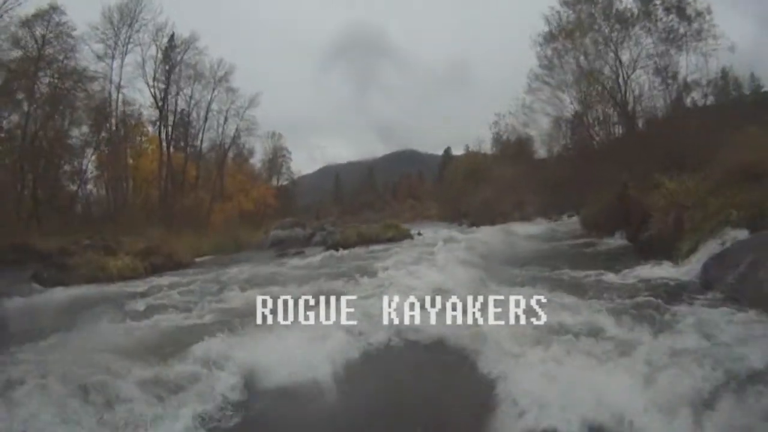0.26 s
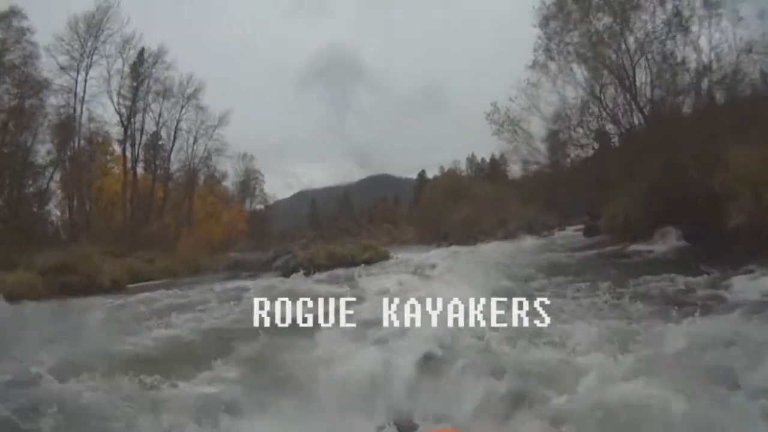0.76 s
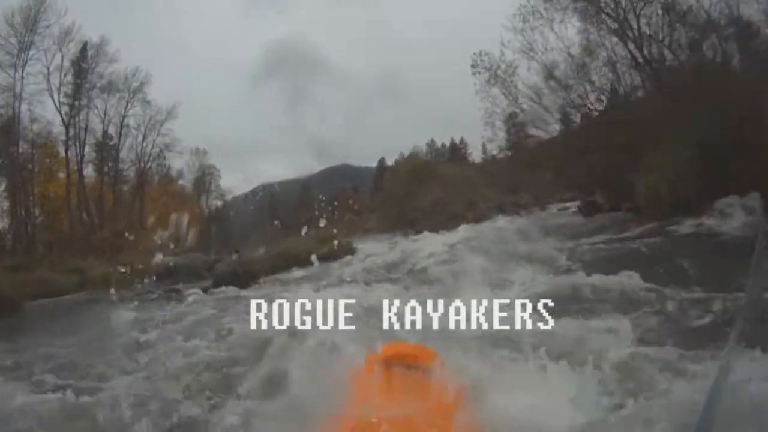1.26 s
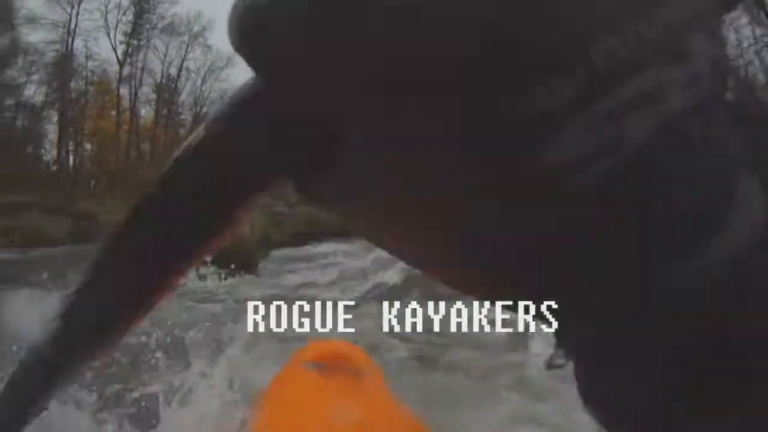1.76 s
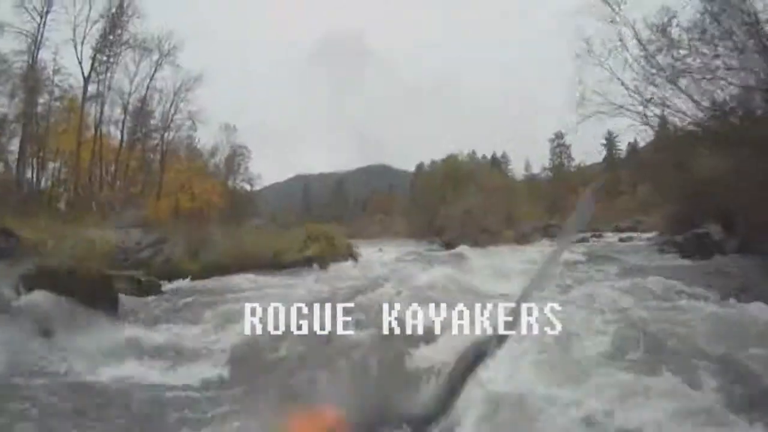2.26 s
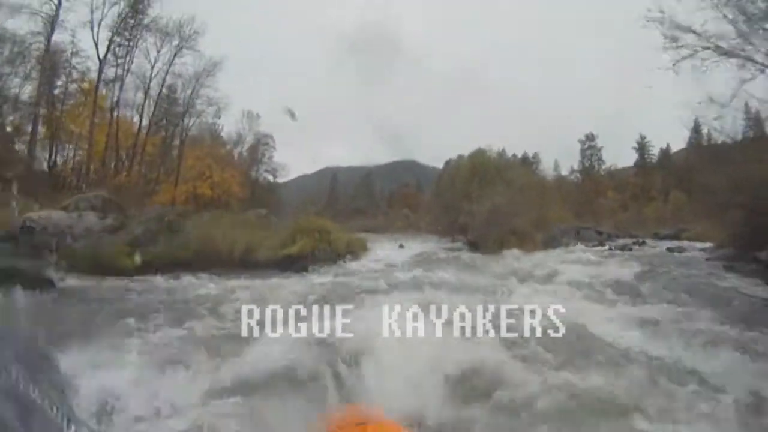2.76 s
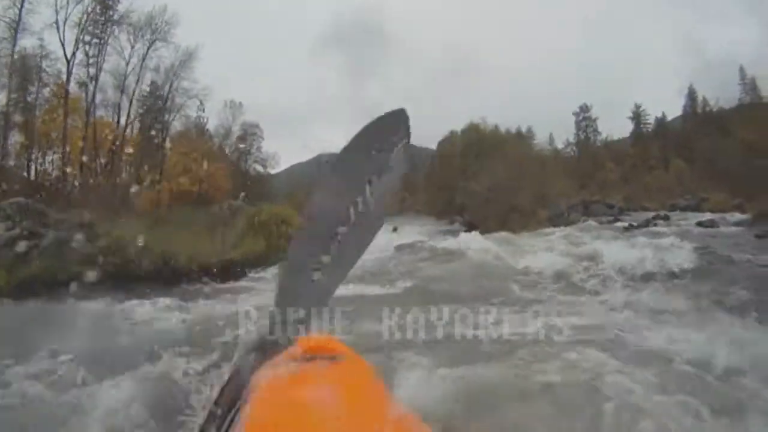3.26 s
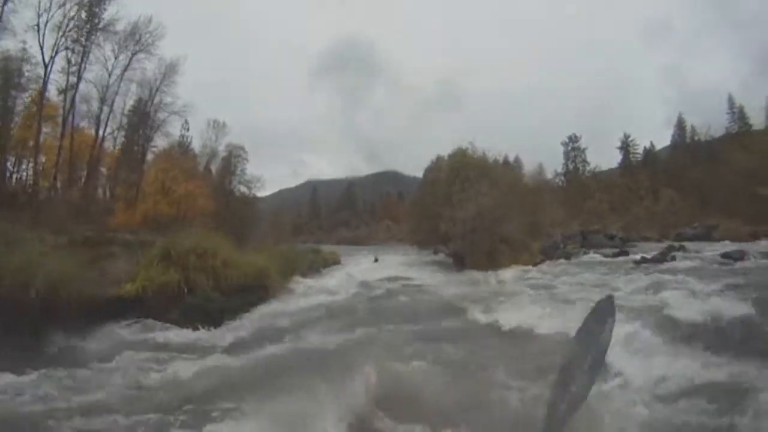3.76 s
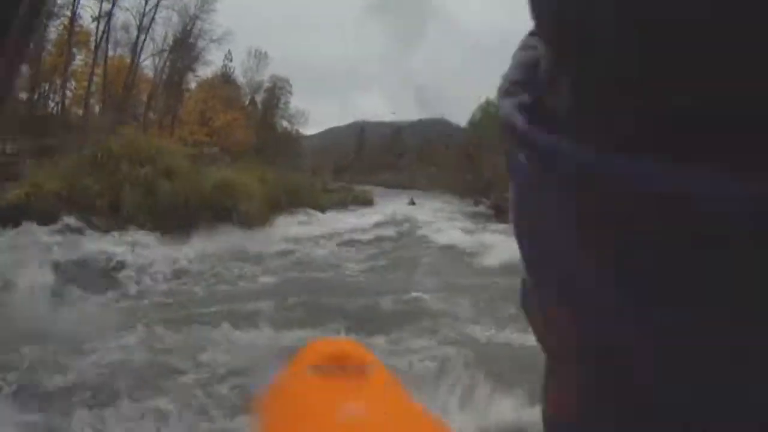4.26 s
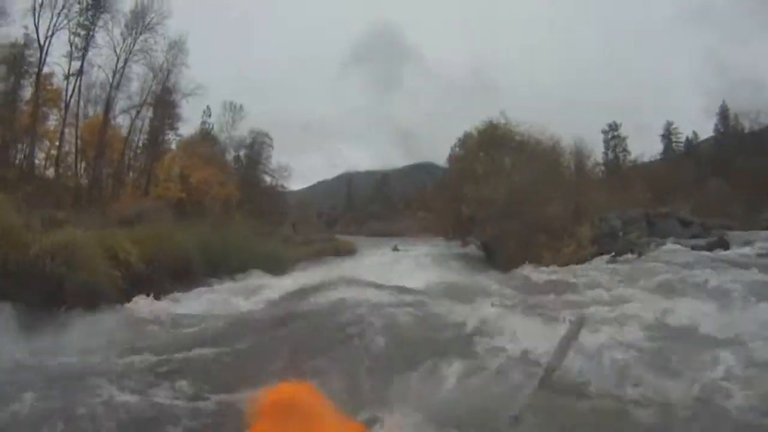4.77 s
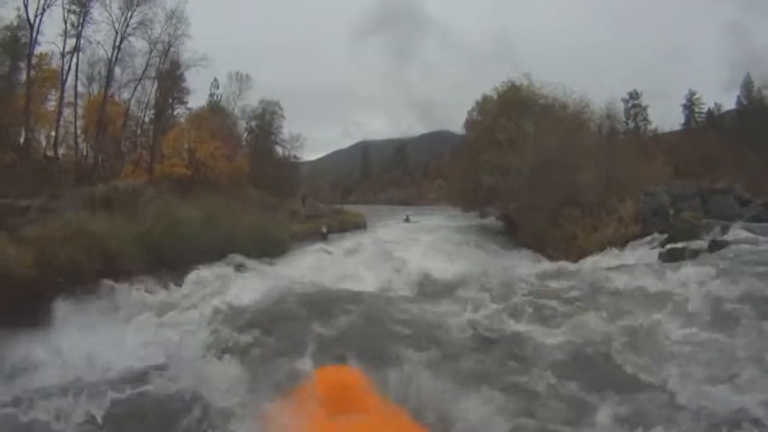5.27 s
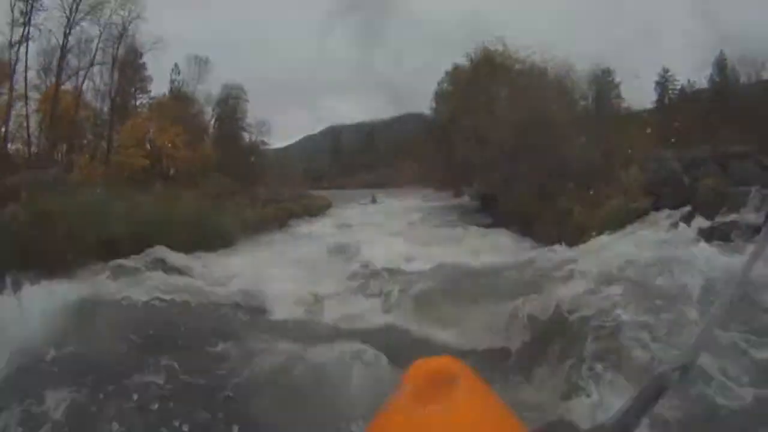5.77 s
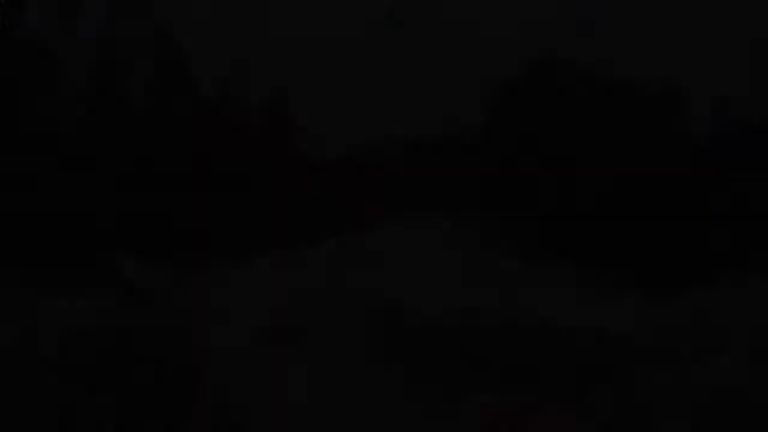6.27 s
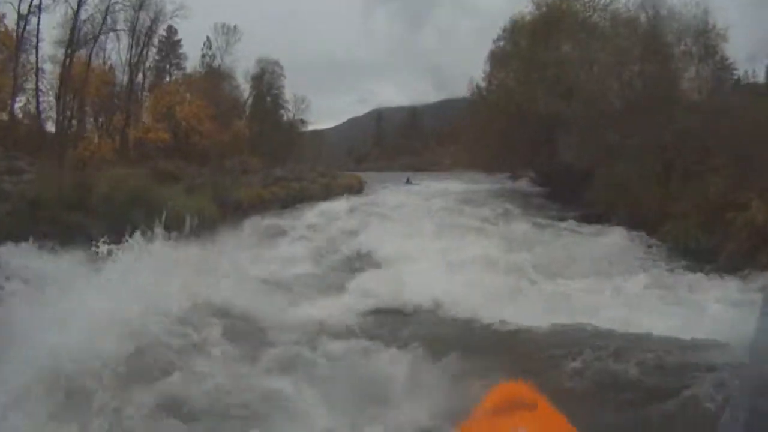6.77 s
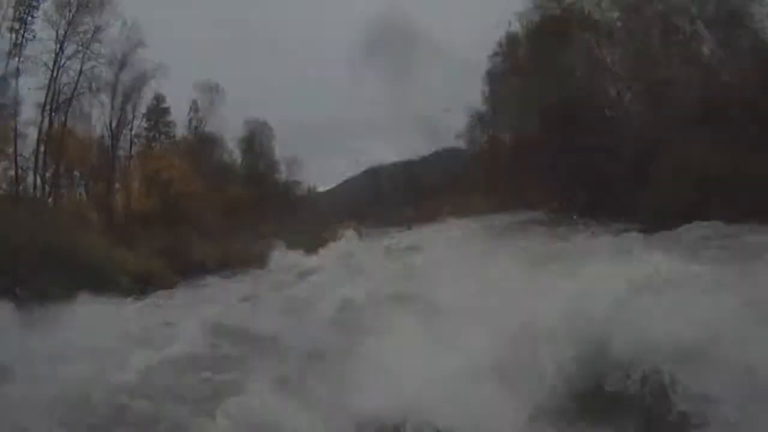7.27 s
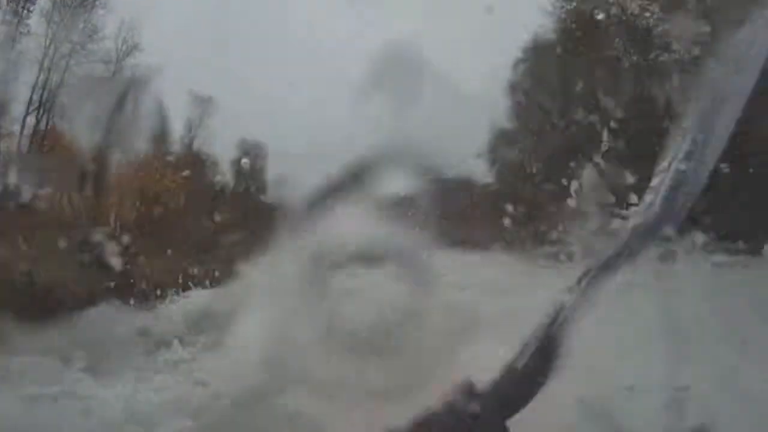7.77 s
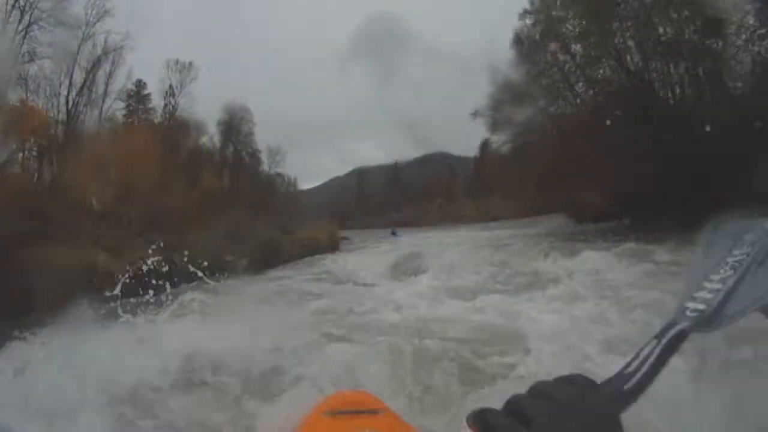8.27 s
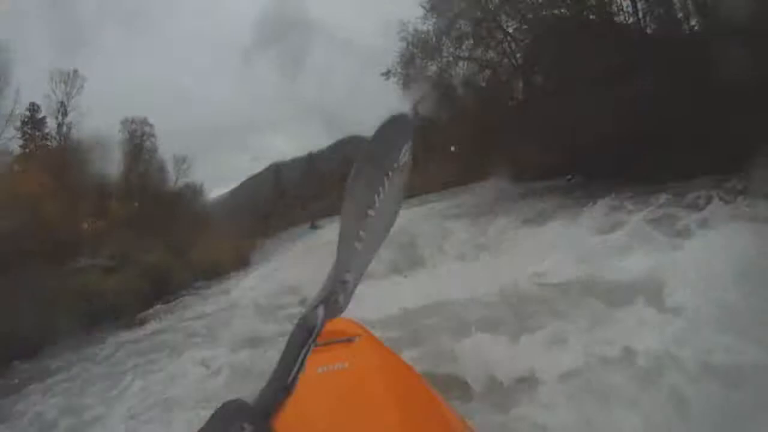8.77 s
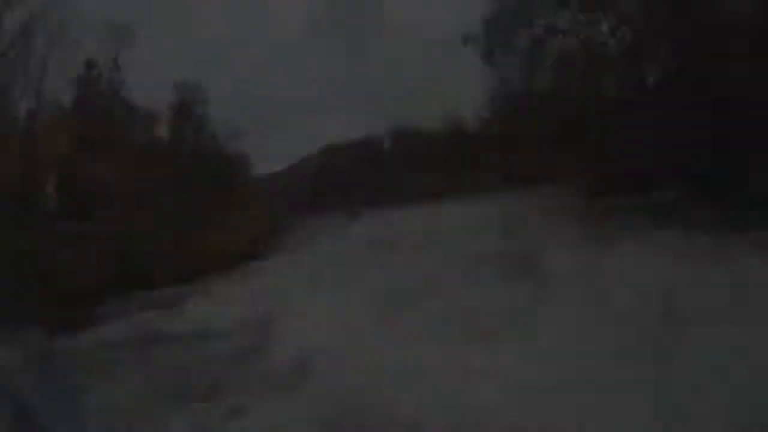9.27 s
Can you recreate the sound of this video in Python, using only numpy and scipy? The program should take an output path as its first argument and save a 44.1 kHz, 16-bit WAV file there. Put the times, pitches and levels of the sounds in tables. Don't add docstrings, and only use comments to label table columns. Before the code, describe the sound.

A continuous rapid roars from inside a kayak, heard by a helmet camera in a sealed plastic housing, so the foam sounds boxy and nasal. Low rocking thumps, hull slaps, paddle gulps and scattered drops mark the ride. It fades to silence after six seconds, swells into a dense splash, cuts off sharply, then fades back with dripping ticks and two heavy thumps near the end.

```python
import sys
import numpy as np
from scipy import signal
from scipy.fft import rfft, irfft, next_fast_len
from scipy.io import wavfile
from scipy.ndimage import uniform_filter1d, map_coordinates

SR = 44100
rng = np.random.default_rng(int(sys.argv[2]) if len(sys.argv) > 2 else 0)


def to_linear_factor(level_db):
    exponent = np.asarray(level_db, float) / 20
    return 10 ** exponent


def store_wav(level_fs):
    pcm = np.round(np.clip(np.atleast_2d(level_fs), -1, 1) * 32767)
    wavfile.write(sys.argv[1], SR, pcm.T.astype(np.int16))


N = 420273


def unit(x):
    return x / np.sqrt(np.mean(x ** 2) + 1e-20)


def along(points, hz):
    f, v = np.transpose(points)
    return np.interp(np.log(hz + 1), np.log(f + 1), v)


def curves(rows):
    s, *cols = np.transpose(rows)
    return [np.interp(np.arange(N) / SR, s, c) for c in cols]


def swells(rows):
    s, half, *cols = np.transpose(rows)
    t = np.arange(0, N / SR + 1, 0.002)
    bells = np.exp(-((t[:, None] - s) / half) ** 2)
    return curves(np.column_stack([t] + [bells @ c for c in cols]))


def wobble(rate):
    return map_coordinates(rng.standard_normal(int(N * rate / SR) + 4), [np.arange(N) * rate / SR])


def humps(modes, hz, order):
    return sum(to_linear_factor(db) ** 2 / (1 + (2 * (hz - c) / w) ** 2) ** order for c, w, db in modes)


def above(hz, edge_hz):
    return 1 / (1 + (edge_hz / (hz + 1)) ** 6)


def coloured(x, power):
    m = 2 * next_fast_len(N // 2 + SR // 2)
    cep = irfft(np.log(power(np.fft.rfftfreq(m, 1 / SR)) + 1e-12) / 2, m)
    cep[1:m // 2] *= 2
    cep[m // 2 + 1:] = 0
    return irfft(rfft(x, m) * np.exp(rfft(cep)), m)[:N]


def add(track, s, sound):
    part = track[round(s * SR):][:len(sound)]
    part += sound[:len(part)]


def housing(x):
    # centre in Hz, width in Hz, level in dB.
    resonances = [(1270, 310, -2), (2047, 308, 2), (2310, 540, 0.5), (2480, 306, 1), (3500, 330, -4),
                  (3800, 630, -8.5), (4620, 1100, -12.5), (5440, 410, -19), (5550, 250, -22.5),
                  (6470, 370, -18.5), (6950, 650, -17.5), (7370, 640, -17), (8374, 690, -12.5),
                  (9556, 390, -10.5), (9900, 290, -12), (10710, 450, -23), (12880, 300, -32),
                  (13360, 330, -21.5), (13820, 280, -21), (14280, 510, -13), (14800, 400, -19)]
    # frequency in Hz, level in dB.
    leak = [(500, -19.5), (1500, -21), (3000, -13), (5200, -19), (6050, -41), (7500, -19), (10500, -29.5),
            (12200, -37), (13600, -48), (15000, -45)]
    return coloured(x, lambda hz: humps(resonances, hz, order=2) + to_linear_factor(along(leak, hz)) ** 2)


def patchy(patchy_db):
    z = signal.stft(rng.standard_normal(N + 512), nperseg=512)[2]
    field = uniform_filter1d(rng.standard_normal(z.shape), 8, 0)
    field = uniform_filter1d(field, 10, 1)
    return unit(signal.istft(z * to_linear_factor(patchy_db * unit(field)), nperseg=512)[1][:N])


def foam(rate):
    burst = rng.random(N) < rate / SR * to_linear_factor(4 * wobble(20))
    sizes = burst * to_linear_factor(3 * np.minimum(rng.exponential(size=N), 3))
    puff = np.exp(-np.arange(200) / (0.0013 * SR))
    return unit(signal.fftconvolve(sizes, puff)[:N] * rng.standard_normal(N))


def river():
    # time in seconds, roar in dB, mount rocking in dB.
    flow = [(0, -53, -63), (.5, -46.5, -63.5), (1.0, -47.5, -55), (1.7, -52, -55.5), (2.3, -50.5, -54),
            (3.8, -51.5, -57.5), (4.65, -51.5, -54), (4.8, -53.5, -58), (5.5, -53.5, -57),
            (6.42, -49.5, -57), (6.85, -46, -51.5), (7.6, -44, -51), (7.7, -53.5, -59),
            (8.04, -51.5, -50.5), (8.2, -47, -48), (8.55, -47.5, -49.5), (9.13, -55, -45.5),
            (9.52, -59, -58.5)]
    # time in seconds, half length in seconds,
    # roar swell in dB, extra spray in dB.
    surges = [(.7, 0.073, 1.5, 0.5), (1.31, 0.16, -2.5, 1.5), (1.45, 0.079, 2.5, -0.5),
              (2.03, 0.088, 0.5, 0.5), (2.4, 0.08, 0.5, 0), (2.74, 0.069, 1, 0), (2.89, .05, -1, 0.5),
              (3.0, 0.13, 1, 2), (3.31, 0.16, 4, 0.5), (4.0, 0.18, 1.5, 0), (4.19, 0.084, 3.5, 0.5),
              (4.58, 0.077, 1, 0.5), (7.24, 0.059, 2.5, 0), (6.32, .05, -0.5, -1),
              (7.45, 0.038, -3.5, -1.5), (7.59, 0.041, -8, -1.5), (7.8, 0.013, -7, 1),
              (8.65, 0.043, 4, 2.5), (.45, 0.074, 0, 0.5), (7.5, 0.014, -3, 0), (7.555, .008, 1, 3),
              (5.19, .05, -0.5, -1), (8.73, 0.021, 0, -0.5), (8.95, 0.084, 3.5, 2), (9.27, 0.071, 5, 1.5),
              (9.39, 0.057, 4.5, 1.5)]
    # time in seconds, half length in seconds,
    # change of rocking in dB.
    lurches = [(.82, .08, -3), (1.1, 0.11, -6), (1.33, .07, 4), (1.55, .12, -0.5), (2.12, .1, 3),
               (2.64, 0.048, -2), (3.0, 0.13, 5), (3.26, 0.2, 7), (4.09, 0.067, 9.5), (4.31, 0.14, 12),
               (4.42, 0.022, -4), (4.53, .03, -3), (4.7, .04, -4), (1.7, .05, -1), (1.88, .05, 0.5),
               (7.7, .1, -3.5), (5.22, 0.046, -5), (4.2, .05, 2), (3.4, 0.066, -4), (4.92, 0.076, 6.5),
               (5.72, 0.17, 7), (6.97, 0.086, 8), (7.26, 0.11, 1.5), (8.4, 0.045, 1), (8.6, 0.022, 8),
               (8.8, 0.049, 5.5), (9.15, 0.032, 5), (9.33, .04, 4)]
    # frequency in Hz, level in dB.
    body = [(40, -32.5), (80, -4.5), (160, -5.5), (300, -4), (600, -9), (1000, -7.5), (1400, -21.5),
            (2500, -53)]
    # centre in Hz, width in Hz, level in dB.
    mount = [(42.8, 17, 0), (58, 30, -12), (28.2, 14, -4)]
    # centre in Hz, width in Hz, level in dB.
    slosh = [(102, 123, -18.5)]
    wash_over_roar_db, surge_share, rocking_share = -9, 0.73, 0.13

    flow_db, rock_db = curves(flow)
    surge_db, spray_db = swells(surges)
    lurch_db, = swells(lurches)
    rock_db = rock_db + lurch_db
    churn_db = 0.33 * wobble(4.7) + 0.5 * wobble(25)

    roar = unit(housing(patchy(patchy_db=0.76) + to_linear_factor(-8.0) * foam(370)))
    spray = coloured(roar, lambda hz: above(hz, 2100))
    wash = unit(coloured(patchy(patchy_db=1.5), lambda hz: to_linear_factor(along(body, hz)) ** 2))
    rock = unit(coloured(rng.standard_normal(N), lambda hz: humps(mount + slosh, hz, order=2)))

    brighter = roar + (to_linear_factor(spray_db + 1.55) - 1) * spray
    air = to_linear_factor(flow_db + surge_db + churn_db + 2.5) * brighter
    wash_db = flow_db + wash_over_roar_db + surge_share * surge_db + churn_db
    wash_db = wash_db + rocking_share * (rock_db - flow_db)
    return air + to_linear_factor(wash_db) * wash + to_linear_factor(rock_db - 0.5 + 0.94 * wobble(7.5)) * rock


def ring(modes, hz, t, detune):
    out = 0
    for (multiple, db, t60), d in zip(modes, detune):
        mode_hz = hz * multiple * (1 + 0.025 * d)
        out = out + to_linear_factor(db - 60 * t / t60) * np.sin(2 * np.pi * mode_hz * t)
    return out * (1 - np.exp(-t / 0.00036))


def drops():
    # time in
    # seconds, hollow tap in dB, sharp tick against the tap in dB, tap in Hz, tick in Hz.
    single_drops = [(2.047, -41, 10.5, 1200, 2050), (2.895, -39, -14, 1270, 2380),
                    (3.021, -32, -3.5, 1350, 2300), (3.0224, -48.5, 15.5, 1100, 2370),
                    (3.0312, -36.5, -5, 1150, 2130), (3.081, -40, -11, 1020, 2310),
                    (4.62, -48, 14, 1280, 2520), (4.654, -44.5, 5, 950, 2170),
                    (5.302, -42, -10, 1090, 2400), (5.475, -29, -16, 1130, 2290),
                    (6.021, -40, 6, 1240, 2130), (6.054, -40.5, -8, 1030, 2130),
                    (6.231, -34, -14, 990, 2130), (6.96, -41, 8, 1110, 2300),
                    (7.061, -27.5, -8, 1075, 2050), (.415, -57, 13, 1250, 2120),
                    (0.441, -60, 13, 1250, 2550), (1.243, -46, 10, 1250, 2370), (4.161, -45, 1, 1250, 2480),
                    (5.224, -50, -4, 1000, 2300), (5.591, -47, -11, 1100, 2300),
                    (6.79, -51, 11, 1250, 2180), (7.033, -47, 11, 1250, 2460), (3.351, -49, 9, 1250, 2300),
                    (8.059, -42, -10, 1220, 2190), (8.175, -41, 5, 1350, 1950), (8.25, -39.5, 5, 1380, 2000),
             (8.3, -40, 3, 1290, 1990), (8.12, -49, 8, 1290, 2470), (8.205, -47, 11, 1290, 2050),
             (8.376, -55, -3, 990, 2380), (8.3968, -38, 2, 1520, 2410), (8.533, -33.5, -2, 1180, 2170),
             (8.78, -39.5, -9, 1300, 2480), (8.883, -37, -17, 1130, 2310), (8.931, -55, 6, 1230, 2250),
             (9.153, -33.5, -5, 1070, 2130), (9.323, -39.5, 1.5, 1090, 2340), (9.472, -43.5, 0, 1210, 2150),
             (9.523, -48.5, 4, 1220, 2500)]
    # time in seconds,
    # tap in dB, tick against it in dB, fine spit against it in dB, tap in Hz.
    splash = [(7.377, -33, -4, -8, 1250), (7.4196, -27, 10, 5, 1700), (7.428, -51.5, 10, 23, 1230),
              (7.4508, -27, -2, -1.5, 1280), (7.4534, -31.5, -7, -1, 1500), (7.475, -36.5, 11, 7, 1670),
              (7.5204, -34.5, 2, 4.5, 1370), (7.5265, -54.5, 14, 9, 1370), (7.5315, -52, 12, 6, 1370),
              (7.5416, -43, 14.5, 7, 1370), (7.5649, -46, 4, 8, 1300), (7.5686, -31, -9, -3, 1190),
              (7.571, -36, -9, -5, 1280), (7.5843, -48, 8, 4, 1180), (7.589, -46, -6, -4, 1000),
              (7.601, -44.5, -2, 4, 1110), (7.72, -47, -2, -8.5, 1190), (7.753, -41, 4.5, -11, 1500),
              (7.785, -41, -4, -12, 1220), (7.81, -54, 12, 1, 1120), (7.834, -48.5, 6, 10, 1410),
              (7.8448, -53, 8, 16.5, 1300), (7.870, -37, 3, -1, 1390)]
    # time in seconds, level in dB.
    knocks = [(3.081, -42), (6.964, -35), (7.064, -34), (7.377, -29), (7.4199, -24.5), (7.451, -35),
              (7.541, -37), (7.568, -28), (7.785, -35), (8.06, -37), (8.252, -38), (8.301, -40),
              (8.533, -37), (9.323, -32.5)]
    # multiple of the tap, level in dB, t60 in seconds.
    shell = [(.58, -11, 0.0078), (.8, -9, 0.013), (1, 6.5, 0.0099), (1.25, -6, 0.007)]
    # multiple of the tick, level in dB, t60 in seconds.
    cavity = [(.96, 4, 0.013), (1.06, -10, .009)]
    # multiple of the splash tick, level in dB, t60 in seconds.
    seam = [(1.6, -2.5, 0.0096), (3.55, -8, 0.0069)]
    splash_tick_hz, knock_db, kick_db, ping_db = 2350, -18, -17.5, -17

    rings, spits, pings = np.zeros(N), np.zeros(N), np.zeros(N)
    t = np.arange(SR // 8) / SR
    knock = np.sin(2 * np.pi * 330 * t) * to_linear_factor(-60 * t / 0.0056)
    kick = np.sin(2 * np.pi * 47 * t) * to_linear_factor(-60 * t / 0.1)
    hits = [(*row, splash_tick_hz) for row in splash]
    for s, db, tick_db, tap_hz, tick_hz in single_drops:
        hits.append((s, db, tick_db, -6 + 0.5 * tick_db, tap_hz, tick_hz))

    for s, db, tick_db, spit_db, tap_hz, tick_hz in hits:
        detune, hiss = rng.standard_normal((2, len(t)))
        spit = hiss * (1 - np.exp(-t / 0.0004)) * to_linear_factor(-60 * t / 0.0065)
        add(rings, s, to_linear_factor(db) * ring(shell, tap_hz, t, detune))
        add(rings, s, to_linear_factor(db + tick_db) * ring(cavity, tick_hz, t, detune[3:]))
        add(rings, s, to_linear_factor(db + spit_db) * ring(seam, splash_tick_hz, t, detune[6:]))
        add(rings, s, to_linear_factor(db + knock_db) * knock + to_linear_factor(db + kick_db) * kick)
        add(pings, s, to_linear_factor(db + ping_db - 60 * t / 0.005) * hiss)
        add(spits, s, to_linear_factor(db + spit_db + 36.5) * spit / np.linalg.norm(spit))
    for s, db in knocks:
        add(rings, s, to_linear_factor(db) * knock)

    clicks = coloured(pings, lambda hz: above(hz, 11000) ** 2)
    spits = coloured(spits, lambda hz: above(hz, 3300) / (1 + (hz / 5500) ** 2) + to_linear_factor(-4) * above(hz, 9800))
    return rings + clicks + housing(spits)


def gulps():
    # start in seconds, length in seconds, first beat in Hz,
    # level in dB, hiss in dB.
    deep = [
        (1.224, 0.082, 118, -43.5, -47),
        (2.89, 0.14, 135.8, -42.5, -48),
        (4.14, 0.12, 93, -37, -53),
        (4.754, 0.075, 72, -40.5, -65),
        (5.639, 0.086, 79.5, -40, -55.5),
        (6.776, 0.062, 105, -37.5, -63),
        (8.621, 0.057, 109, -40, -57),
    ]
    # start in seconds, length in seconds, first beat in Hz,
    # level in dB, hiss in dB.
    burps = [(1.29, 0.094, 161, -54, -51), (4.3, 0.092, 110, -45, -53.5), (1.78, .06, 180, -54.5, -62),
             (9.108, .016, 296, -48, -62), (9.035, .02, 304, -55, -60), (5.222, 0.0222, 307, -54, -58),
             (6.12, .05, 200, -52, -58), (1.93, 0.037, 330, -59, -57), (5.68, 0.045, 150, -43, -67),
             (7.872, 0.092, 147, -53, -59), (8.142, 0.0366, 136, -43.5, -53),
             (8.586, 0.036, 297, -46.5, -64)]
    # centre in Hz, width in Hz, level in dB.
    folding = [(183, 82, -6), (450, 280, -15), (870, 150, -5.5), (1350, 180, 1)]
    full_hz, burp_sag = 61.4, 0.733

    beats, hiss = np.zeros(N), np.zeros(N)
    uneven, shake = wobble(45), wobble(60)
    pockets = [(*row, full_hz) for row in deep] + [(*row, burp_sag * row[2]) for row in burps]
    for s, length, first_hz, db, hiss_db, last_hz in pockets:
        u = np.linspace(0, 1, round(length * SR))
        here = slice(round(s * SR), round(s * SR) + len(u))
        beat_hz = first_hz * (last_hz / first_hz) ** u ** 0.856 * (1 + 0.064 * uneven[here])
        turn = 2 * np.pi * np.cumsum(beat_hz) / SR
        swell = np.sin(np.pi * u ** 0.6) ** 0.47 * to_linear_factor(1.5 * shake[here])
        lopsided = np.sin(turn) - 0.22 * np.cos(2 * turn) + 0.079 * np.sin(3 * turn)
        add(beats, s, to_linear_factor(db) * swell * lopsided)
        add(hiss, s, to_linear_factor(hiss_db) * swell * (1 + 0.38 * np.sin(turn)))
    duller = coloured(rng.standard_normal(N), lambda hz: 1 / (1 + (hz / 1800) ** 2))
    gurgle = coloured(rng.standard_normal(N), lambda hz: humps(folding, hz, order=2))
    return beats + hiss * (unit(housing(duller)) + to_linear_factor(-4.5) * unit(gurgle))


def slaps():
    # deepest push in seconds, push in dB, half length of the push in seconds, after-swing in dB.
    hull_slaps = [(1.485, -47, 0.012, -14), (2.053, -45.5, 0.0076, -4.5), (3.157, -36.5, 0.015, -16),
                  (3.551, -38.5, 0.0085, -3), (4.458, -38.5, 0.0095, -3), (4.609, -39.5, 0.0074, -1),
                  (5.3, -45, 0.0056, 3), (5.477, -39, 0.0064, -9), (5.97, -46, .008, -7),
                  (6.151, -41, 0.0043, -6), (6.36, -37, .005, -8.5), (7.068, -36.5, 0.0055, -9),
                  (5.63, -37.5, 0.019, -4), (6.992, -31.5, 0.01, -16), (7.41, -40, 0.0058, -22),
                  (8.309, -40.5, 0.006, 6), (8.487, -34.5, 0.01, -6), (8.541, -35, 0.0042, -1),
                  (8.569, -30.5, 0.0121, -11), (8.899, -34, 0.0126, -3), (8.149, -46, 0.0062, -16),
                  (9.063, -19.5, 0.008, -24), (9.13, -21, 0.0085, -6.5)]
    out, t = np.zeros(N), np.arange(-SR // 20, SR // 3) / SR
    for s, db, half, swing_db in hull_slaps:
        u = t / (half * np.where(t < 0, 0.52, 0.27))
        push = np.where(t < 0, u * u - 1, -1) * np.exp(-u * u / 2)
        push += 0.43 * np.exp(-((t / half - 1.55) / 0.6) ** 2)
        late = np.maximum(t - 2.25 * half, 0)
        swing = -to_linear_factor(swing_db - 60 * late / 0.27) * np.sin(2 * np.pi * 41 * late)
        add(out, s + t[0], to_linear_factor(db) * (push + swing))
    return out


def swirl():
    # start in seconds, length in seconds, first pitch in Hz, last pitch in Hz, level in dB.
    jets = [
        (8.601, 0.067, 3850, 4800, -51),
    ]
    out, flutter = np.zeros(N), wobble(357)
    for s, length, first_hz, last_hz, db in jets:
        u = np.linspace(0, 1, round(length * SR))
        turn = 2 * np.pi * np.cumsum(first_hz + (last_hz - first_hz) * u) / SR
        add(out, s, to_linear_factor(db) * np.sin(np.pi * u) * flutter[:len(u)] * np.sin(turn))
    return out


def thinned(x, under_db):
    hz, _, z = signal.stft(x, SR, nperseg=2048)
    patch = uniform_filter1d(np.abs(z) ** 2, size=7, axis=0)
    loud = uniform_filter1d(patch[(hz > 1800) & (hz < 5000)].mean(axis=0), size=5)
    return signal.istft(z * (patch > loud * to_linear_factor(under_db) ** 2), SR, nperseg=2048)[1][:N]


def band_power(x, low_hz, high_hz):
    band = signal.butter(2, [low_hz, high_hz], "band", fs=SR, output="sos")
    return np.abs(uniform_filter1d(signal.sosfilt(band, x) ** 2, size=1800))


def starved(x):
    # start in seconds, end in seconds.
    gaps = [
        (7.449, 7.46),
        (7.508, 7.519),
        (7.6, 7.62),
    ]
    hz, t, z = signal.stft(x, SR, nperseg=256)
    at = np.minimum((t * SR).astype(int), N - 1)
    gap = (wobble(70)[at] > 1.7) | np.any([(t > a) & (t < b) for a, b in gaps], axis=0)
    z[hz > 12300] *= 1 - 0.99 * np.minimum(1.5 * uniform_filter1d(1. * gap, size=3), 1)
    holed = signal.istft(z, SR, nperseg=256)[1][:N]

    roar = band_power(x, 1800, 5000)
    strong = band_power(x, 60, 200) > roar * to_linear_factor(-1 + 2 * wobble(20)) ** 2
    fizz = unit(coloured(rng.standard_normal(N), lambda f: (f > 11800) & (f < 12250)))
    return holed + to_linear_factor(-38) * np.sqrt(roar) * uniform_filter1d(1. * strong, size=300) * fizz


def editor():
    # start in seconds, length in seconds.
    fade_ins = [
        (6.46, 0.34),
        (7.678, 0.2),
    ]
    fade_out_s, silent_s = 4.71, 6.394
    cut_s, tail_s, tail_db, tail_db_per_s = 7.6075, 0.036, -35, -340
    t = np.arange(N) / SR

    def ramp(start, length):
        return np.clip((t - start) / length, 0, 1)

    out = 1 - ramp(fade_out_s, silent_s - fade_out_s)
    tail = to_linear_factor(tail_db + tail_db_per_s * np.maximum(t - cut_s, 0)) * (t < cut_s + tail_s)
    cut = np.where(t < cut_s, ramp(*fade_ins[0]) ** 0.99, tail)
    back = ramp(*fade_ins[1]) ** 1.4
    return np.maximum(out + cut + back, to_linear_factor(-58))


def scene():
    return (river() + drops() + gulps() + slaps() + swirl())[None]


def roll_off(x):
    return signal.sosfilt(signal.butter(12, 16300, fs=SR, output="sos"), x)


def record(dry):
    top_hz = 15120
    kept = coloured(dry[0], lambda hz: above(hz, 12) * (to_linear_factor(-40) + 1 / (1 + (hz / top_hz) ** 800)))
    faded = starved(thinned(kept, under_db=-27.0)) * editor()
    return roll_off(faded[None])


dry = scene()
out = record(dry)
store_wav(out)
```